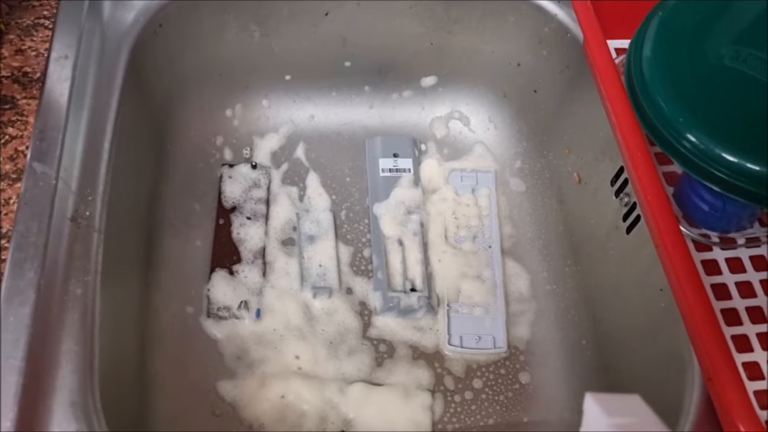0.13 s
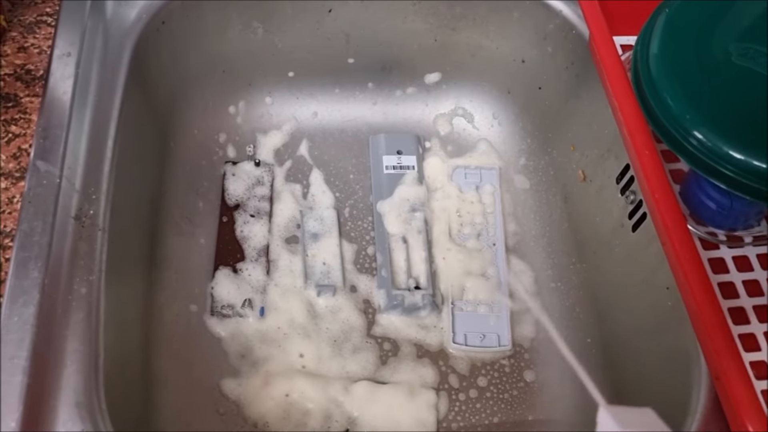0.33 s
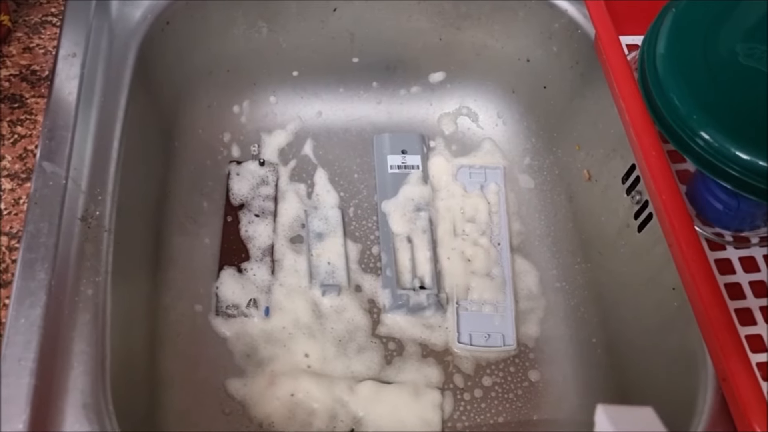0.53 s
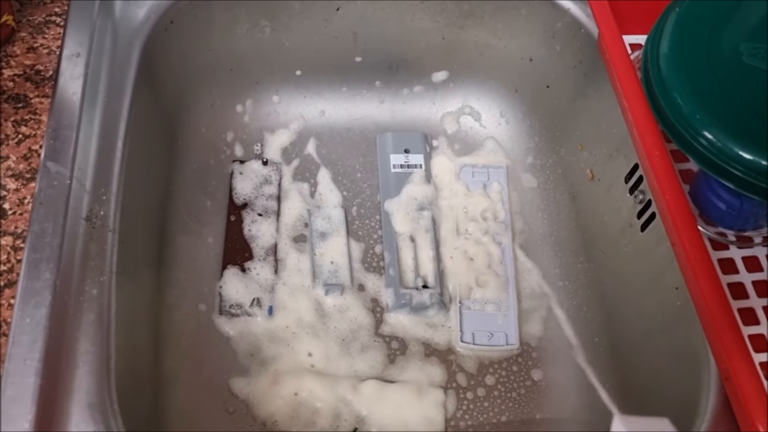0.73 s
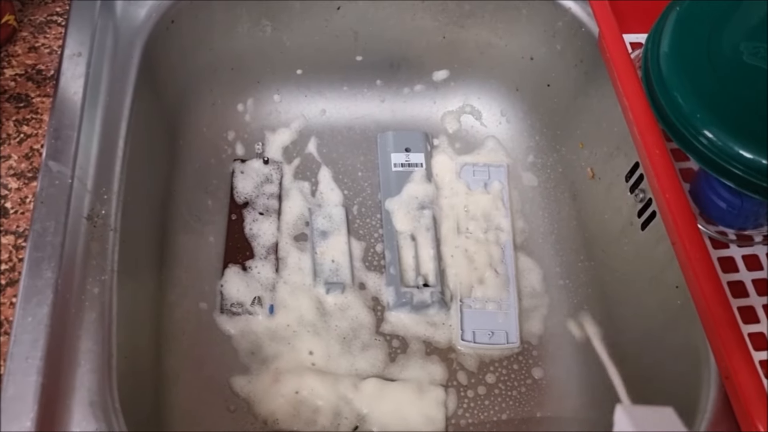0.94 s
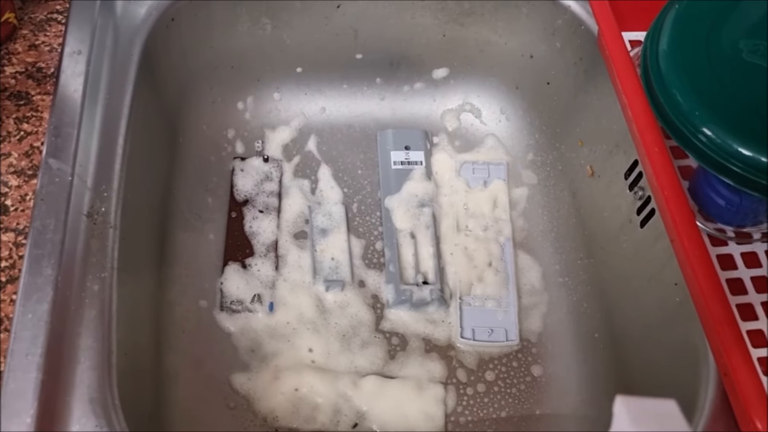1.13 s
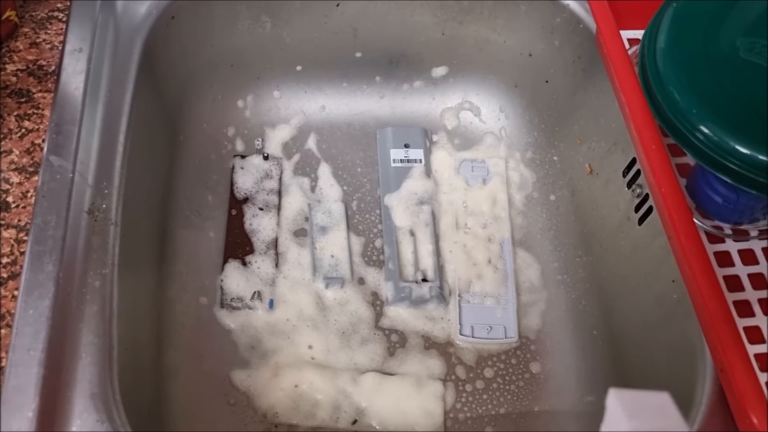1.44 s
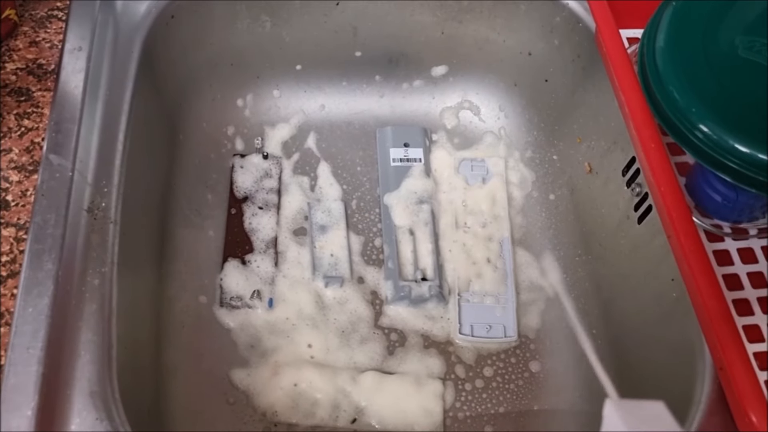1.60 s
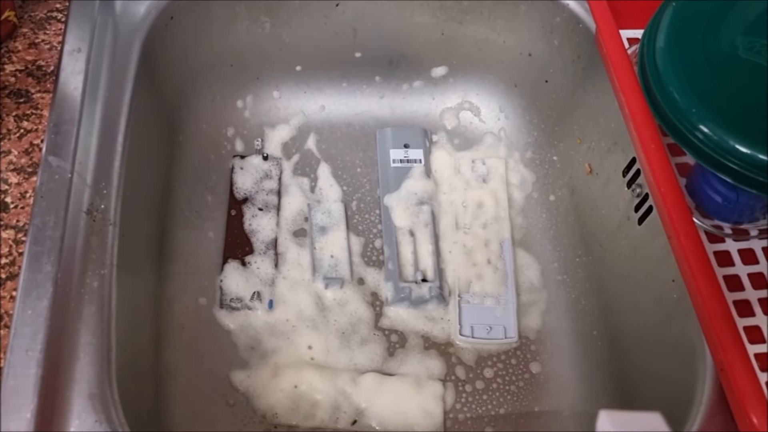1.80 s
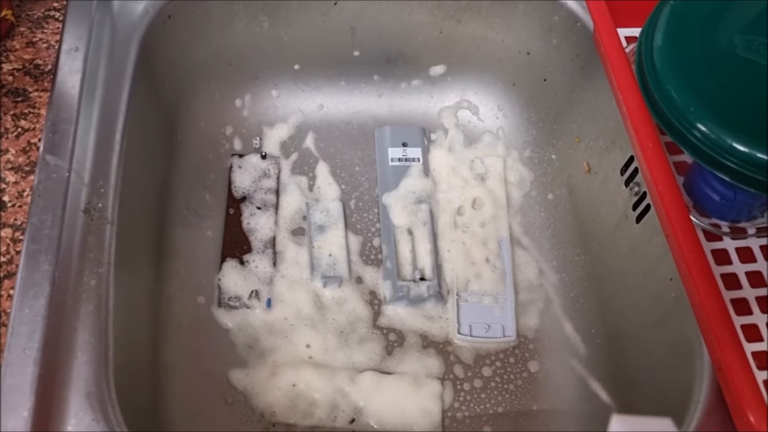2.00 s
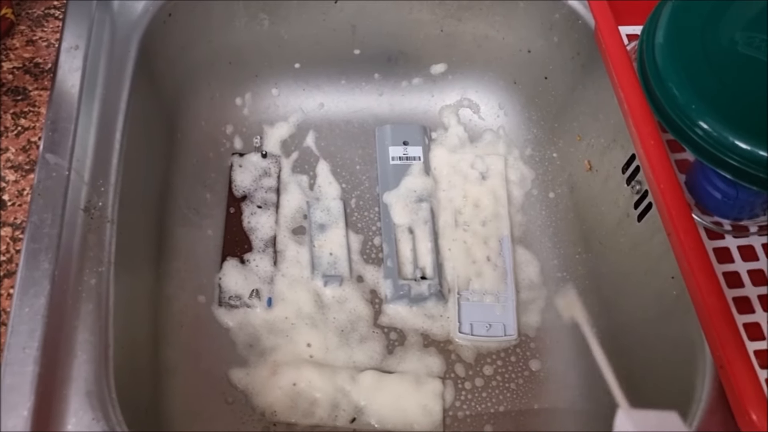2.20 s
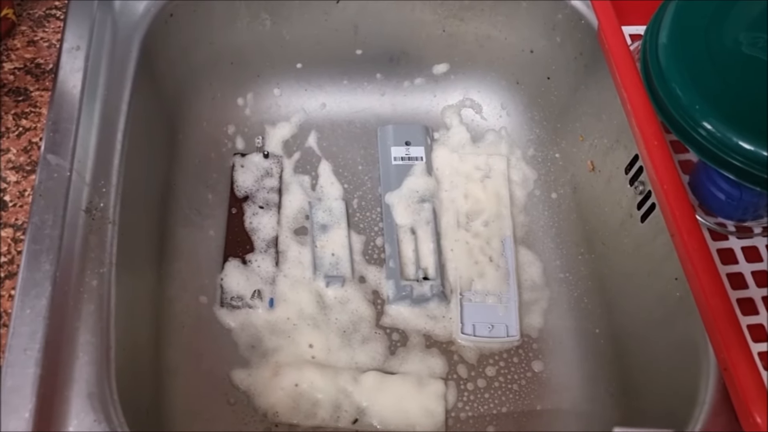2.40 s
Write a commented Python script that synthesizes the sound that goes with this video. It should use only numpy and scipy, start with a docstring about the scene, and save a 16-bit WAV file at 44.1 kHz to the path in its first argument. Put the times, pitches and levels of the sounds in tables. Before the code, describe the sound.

A trigger spray bottle is pumped eight times, close up, over a steel kitchen sink. Bright, slightly whistling hissing squirts of about 0.1 second start near 0.05, 0.4, 0.7, 1.0, 1.35, 1.7, 2.0 and 2.3 seconds. Plastic clicks and rattles come before and between them, with soft liquid slops and fine droplet patter after each. Dull hand bumps open it; a faint low appliance hum continues beneath.

```python
"""Over a steel kitchen sink, a trigger spray bottle is pumped eight times, close to a two-port microphone.
Each squeeze: plastic clicks ring the trigger's modes, the valve snaps and spits noise, and the jet hisses and
sings through nozzle resonances as pressure swells and sags. Droplets patter out as bursts of random impulses,
liquid slops in lumpy noise swells and the trigger rattles. An appliance hums on wavering sines over faint air."""
import sys
import numpy as np
from scipy import signal
from scipy.fft import rfft, irfft
from scipy.io import wavfile

SR = 44100
rng = np.random.default_rng(int(sys.argv[2]) if len(sys.argv) > 2 else 0)


def wrap_up_sound(samples):
    """Save the sound to the file named by the first command line argument, as 16-bit audio."""
    columns = np.atleast_2d(samples).T
    # keep every value between -1 and 1, then stretch to whole-number steps
    tamed = np.clip(columns, -1, 1)
    steps = np.round(tamed * 32767).astype(np.int16)
    wavfile.write(sys.argv[1], SR, steps)


def invert_db(level):
    """Linear amplitude ratio for a level in decibels (20 dB per decade), elementwise."""
    return 10 ** (np.asarray(level, dtype=float) / 20)


N = 112454

# Orders of the appliance's motor: f/Hz, level/dB
MOTOR_ORDERS = [(40.4, -61.5), (80, -63), (121, -76), (160.6, -66)]
# Spectrum of the room's air: f/Hz, relative level/dB
AIR_SPECTRUM = [(26, -29), (36, -19), (65, -7), (100, -2), (230, -10), (330, -6), (960, -21), (1330, -30),
                (1940, -27), (4000, -25), (8000, -27), (16000, -63)]
# Likeness of the air at left and right: f/Hz, likeness/1
AIR_LIKENESS = [(60, 0.71), (300, 0.68), (1000, 0.23), (4000, 0.09)]
# Soft bumps of the hand: t/s, level/dB, f/Hz, T60/s
HAND_BUMPS = [(0.05, -33.5, 72.5, 0.34), (0.086, -32, 81, 0.11), (0.141, -45, 66, 0.18),
              (0.186, -50, 325, 0.23), (.215, -46, 288, 0.128), (0.584, -43.5, 127.6, 0.22)]
# Piston knocking back after each squeeze: t/s, level before the knock trim/dB
PISTON_KNOCKS = [(0.191, -45.5), (0.551, -48.5), (0.872, -43), (1.191, -51.5), (1.499, -46.5),
                 (1.82, -45.5), (2.139, -51), (2.441, -49.5)]
# Spectrum of liquid slopping in the pump: f/Hz, relative level/dB
SLOP_SPECTRUM = [(200, -21.5), (330, -3), (450, -12.5), (580, -5.5), (720, -3.5), (850, -4), (1000, -7),
                 (1600, -9), (2200, -31.5)]
# Trigger clicks: t/s, level before the click trim/dB, lift of the upper modes/dB
TRIGGER_CLICKS = [(0.016, -45, -16), (0.209, -41.5, -8), (0.2276, -42.5, -1), (0.261, -46, -5),
                  (0.2786, -44, 3), (0.344, -54, -8), (0.379, -42, -10), (0.403, -37.5, -22),
                  (0.6097, -39, -7), (0.7, -45, 5), (0.7245, -35, -18), (0.8738, -40, -7),
                  (0.9425, -42, -8), (1.0164, -42.5, 7), (1.039, -35, -14), (1.231, -46, 5),
                  (1.3414, -40, 0), (1.357, -40, -5), (1.3657, -32, -5), (1.5156, -51, -7),
                  (1.5614, -41.5, -3), (1.662, -40.5, 5), (1.6784, -43.5, -9), (1.6867, -32, -20),
                  (1.8683, -45, 5), (1.91, -51, -9), (1.967, -48, -11), (1.9755, -41, 5), (1.989, -39, -11),
                  (1.9973, -30.5, -4), (2.1768, -40, 7), (2.2785, -40.5, 3), (2.295, -38, -9),
                  (2.302, -35, 4), (2.472, -39, -5.0), (2.4987, -49, -9)]
# Lower modes of the plastic trigger, before the grip shifts them: f/Hz, level/dB, T60/s
TRIGGER_LOW_MODES = [(810, -23, 0.011), (1244, -12, 0.075), (1295, -2.5, 0.05), (1344, 3.5, 0.028),
                     (1510, -7, 0.009), (1690, -2.5, 0.016), (1870, -14.5, .01)]
# Upper modes of the trigger, which follow each click's lift: f/Hz, level/dB, T60/s
TRIGGER_HIGH_MODES = [(2550, -11, 0.024), (2980, 0.5, 0.018), (3940, -25, 0.0028)]
# Spectrum of droplets on foam and steel: f/Hz, relative level/dB
PATTER_SPECTRUM = [(180, -58), (300, -3.5), (447, -35), (1030, -11), (1340, -9), (1610, -10), (2480, -3.5),
                   (3580, -4), (16000, -23.5)]
# Squeezes: valve opens t/s, top of pressure t/s, valve shuts t/s, top level/dB, mist lift/dB
PUMP_SQUEEZES = [(0.051, 0.141, 0.2, -38, 3), (0.4, 0.461, 0.54, -37, -.5),
                 (0.7218, 0.802, 0.87, -38, -0.5), (1.033, 1.104, 1.1654, -37.5, -1),
                 (1.3584, 1.407, 1.514, -37.5, -.5), (1.6787, 1.744, 1.8184, -37.5, -0.3),
                 (1.9894, 2.05, 2.113, -36, -3), (2.295, 2.345, 2.424, -37.5, -4.5)]
# Nozzle resonances, before wander and widening: centre f/Hz, width f/Hz, relative level/dB
NOZZLE_MODES = [(2327, 157, -8.5), (2525, 260, -11.5), (2745, 190, -2.5), (2970, 107, -9), (3220, 110, -7),
                (3820, 98, -17), (1320, 110, -18.5)]
# Hiss of the jet: f/Hz, relative level/dB
MIST_SPECTRUM = [(2000, -29.5), (3300, 3), (3600, -2), (3870, -0.5), (4500, 1.5), (5280, 4), (5800, 2.5),
                 (6290, 3), (6710, -3.5), (7300, 4.5), (8000, 0), (8810, -7), (9600, -7), (10500, -2),
                 (12000, -8), (16500, -4)]
# Finest spray: f/Hz, relative level/dB
FIZZ_SPECTRUM = [(9000, -33), (11500, -3.5), (13800, 1.5), (16500, -3.5)]
# Dry treble ticks of droplets and spring: t/s, level before the tick trim/dB
DRY_TICKS = [(0.261, -44), (0.342, -45.5), (0.378, -45.5), (0.587, -46), (0.681, -41), (0.7045, -41.5),
             (0.889, -36.5), (0.918, -42), (1.0174, -43), (1.231, -47), (1.342, -38.5), (1.662, -41),
             (1.912, -40.5), (1.9753, -36.5), (2.206, -44), (2.2805, -38)]
# Spectrum of those ticks: f/Hz, relative level/dB
TICK_SPECTRUM = [(2000, -3), (3000, -2.5), (5500, -1.5), (8000, -3), (9500, -14), (16000, -18)]


def evened(x):
    """Scales x to rms 1."""
    return x / np.sqrt(np.mean(x ** 2) + 1e-20)


def read(points, hz):
    """Reads a spectrum table at hz, along a log frequency axis."""
    f, value = np.transpose(points)
    return np.interp(np.log(hz + 1), np.log(f + 1), value)


def colour(x, points):
    """Filters x by a spectrum table, to rms 1."""
    gain = invert_db(read(points, np.fft.rfftfreq(N, 1 / SR)))
    return evened(irfft(rfft(x) * gain, N))


def slow(rate_hz):
    """Smooth random drift: low-passed noise, rms 1."""
    return evened(signal.lfilter(*signal.butter(2, rate_hz, fs=SR), rng.standard_normal(N)))


def resonate(x, hz, width):
    """Shifts the curve hz down to zero, smooths twice, and shifts back: a steep moving resonance."""
    turn = np.exp(2j * np.pi * np.cumsum(hz) / SR)
    r = np.exp(-np.pi * width / SR)
    smooth = signal.lfilter([(1 - r) ** 2], [1, -2 * r, r * r], x / turn)
    return 2 * (turn * smooth).real


def train(times, sizes):
    """One single-sample click per event."""
    out = np.zeros(N)
    np.add.at(out, np.clip((np.asarray(times) * SR).astype(int), 0, N - 1), sizes)
    return out


def fading(x, t60):
    """Instant rise, exponential fall."""
    return signal.lfilter([1], [1, -np.exp(-np.log(1000) / (t60 * SR))], x)


def bursting(per_s, floor_db, spread_db):
    """Levels of random impulses at a mean rate, a few of them far louder than the floor."""
    loudness = invert_db(floor_db + spread_db * np.minimum(rng.exponential(1, N), 4.5))
    return loudness * (rng.random(N) < per_s / SR)


def room():
    """Motor orders waver in level and phase over a quiet noise floor, most alike left and right in the bass."""
    air_db, waver_db, drift_rad = -61, 2.5, 0.59
    t = np.arange(N) / SR
    hum = np.zeros(N)
    for hz, db in MOTOR_ORDERS:
        level = np.sqrt(2) * invert_db(db + waver_db * slow(16.5))
        hum += level * np.sin(2 * np.pi * (hz * t + rng.random()) + drift_rad * slow(1.34))
    a, b = rfft(rng.standard_normal((2, N)))
    same = np.clip(read(AIR_LIKENESS, np.fft.rfftfreq(N, 1 / SR)), 0, 1)
    air = irfft([a, same * a + np.sqrt(1 - same ** 2) * b], N)
    return hum + invert_db(air_db) * np.array([colour(side, AIR_SPECTRUM) for side in air])


def sink(x):
    """Short steel-basin tails of sparse taps, different at each port, blending as the hand sways."""
    t60_s, sway_per_s = 0.057, 9
    taps = rng.choice([-1., 1.], (3, 2, 4000)) * (rng.random((3, 2, 4000)) < 0.3)
    taps *= invert_db(-60 * np.arange(4000) / SR / t60_s)
    taps[..., :40] = 0  # a short gap ahead of the tail
    taps = signal.lfilter(*signal.butter(1, 500, "high", fs=SR), taps)
    taps /= np.linalg.norm(taps, axis=2, keepdims=True)
    thirds = np.arange(3)[:, None] / 3
    sway = np.sqrt(2 / 3) * np.cos(2 * np.pi * (sway_per_s * np.arange(N) / SR + thirds))
    return signal.oaconvolve((x * sway)[:, None], taps, axes=2)[..., :N].sum(0)


def bumps():
    """The hand's dull low pushes: decaying sines with a soft start."""
    t, out = np.arange(N) / SR, np.zeros(N)
    for s, db, hz, t60 in HAND_BUMPS:
        u = np.maximum(t - s, 0)
        out += invert_db(db - 60 * u / t60) * (1 - np.exp(-u / 0.0015)) * np.sin(2 * np.pi * hz * u)
    return out


def slop():
    """Liquid slops in lumpy low-mid swells after the valve opens, and starts sharply as the piston knocks back."""
    swell_db, delay_s, spread_s = -53.5, 0.017, 0.018
    knock_trim_db, knock_t60_s = -8, 0.27
    t, (s, knock_db) = np.arange(N) / SR, np.transpose(PISTON_KNOCKS)
    swell = fading(train(s, invert_db(knock_db + knock_trim_db)), knock_t60_s)
    for opens, *_ in PUMP_SQUEEZES:
        swell += invert_db(swell_db) * np.exp(-0.5 * ((t - opens - delay_s) / spread_s) ** 2)
    lumps = invert_db(2.46 * slow(127.0))
    return swell * lumps * colour(rng.standard_normal(N), SLOP_SPECTRUM)


def trigger():
    """Each click is a soft-starting bump of plastic that rings the trigger's modes; a faint rattle runs between."""
    click_trim_db, scuff_s = -3, 0.0009
    grips, grip_spread = 5, 0.04  # each grip shifts every mode by about this share
    s, db, bright_db = np.transpose(TRIGGER_CLICKS)
    rattle = bursting(370, -68, 2.5)
    t, out = np.arange(2000) / SR, np.zeros(N)
    grip = np.repeat(rng.integers(0, grips, N // 500 + 1), 500)[:N]  # redrawn every 500 samples
    for modes, lift_db in ((TRIGGER_LOW_MODES, 0), (TRIGGER_HIGH_MODES, bright_db)):
        hits = train(s, invert_db(db + lift_db + click_trim_db)) + rattle
        for k in range(grips):
            ring = np.zeros(len(t))
            for hz, mode_db, t60 in modes:
                shifted_hz = hz * (1 + grip_spread * rng.standard_normal())
                ring += invert_db(mode_db - 60 * t / t60) * np.sin(2 * np.pi * (shifted_hz * t + rng.random()))
            soft_ring = ring * (1 - np.exp(-t / scuff_s)) ** 2
            out += signal.oaconvolve(hits * (grip == k), soft_ring)[:N]
    return out


def patter(p_db):
    """Dense small droplets land and burst, lingering after each squeeze."""
    level_db, t60_s = -10, 0.31  # level relative to the smoothed pressure
    drops = rng.standard_normal(N) * bursting(5400, 0, 3.2)
    r = np.exp(-np.log(1000) / (t60_s * SR))
    wet = signal.lfilter([1 - r], [1, -r], invert_db(p_db))
    return invert_db(level_db) * wet * colour(drops, PATTER_SPECTRUM)


def pressure_db():
    """Jumps as the valve opens, swells, sags, and drains once it shuts; also gives each squeeze's mist lift."""
    start_db, sag_db, shut_db_per_s, bend = -10.5, -7, 296, 1.92
    t, out, lift = np.arange(N) / SR, np.full(N, -120.), np.zeros(N)
    for opens, top, shuts, top_db, mist_db in PUMP_SQUEEZES:
        rise = np.clip((top - t) / (top - opens), 0, 1)
        sag = np.clip((t - top) / (shuts - top), 0, 1)
        db = top_db + start_db * rise ** bend + sag_db * sag ** bend
        db -= shut_db_per_s * np.maximum(t - shuts, 0)
        out = np.where(t >= opens, db, out)
        lift = np.where(t >= opens, mist_db, lift)
    return out, lift


def nozzle_tone():
    """Rushing noise rings the nozzle's resonances, which wander as foam passes."""
    rush, tone = rng.standard_normal(N), np.zeros(N)
    for k, (hz, width, db) in enumerate(NOZZLE_MODES):
        wandering_hz = hz + 22 * slow(42)
        tone += (-1) ** k * invert_db(db) * resonate(rush, wandering_hz, width * 1.71)  # alternating sign
    return evened(tone)


def jet(p_db, lift_db):
    """Turbulence rings the nozzle; hiss and fizz grow faster with pressure; the valve snaps and spits open."""
    mist_db, mist_slope, fizz_db, fizz_slope = -37.5, 1.83, -40.5, 2.3  # slopes in dB per dB of pressure
    tone_slope, full_db = 0.22, -37.5  # the nozzle sings best at high pressure
    spit_db, spit_t60_s, snap_db, snap_t60_s = -46.884, 0.066, -35.384, 0.0062
    tick_trim_db, tick_t60_s = -5, 0.023
    over_db = p_db - full_db
    mist = colour(rng.standard_normal(N), MIST_SPECTRUM)
    fizz = colour(rng.standard_normal(N), FIZZ_SPECTRUM)
    tick = colour(rng.standard_normal(N), TICK_SPECTRUM)

    singing = nozzle_tone() * invert_db(p_db + tone_slope * np.maximum(over_db, -15) + 0.5)
    hiss = mist * invert_db(mist_db + lift_db + mist_slope * over_db)
    hiss += fizz * invert_db(fizz_db + lift_db + fizz_slope * over_db)
    flutter = invert_db(1.28 * slow(121))

    opens = train([row[0] for row in PUMP_SQUEEZES], 1)
    spit = invert_db(spit_db) * fading(opens, spit_t60_s) * mist
    snap = invert_db(snap_db) * fading(opens, snap_t60_s) * (mist + 0.46 * fizz)
    s, db = np.transpose(DRY_TICKS)
    ticks = tick * fading(train(s, invert_db(db + tick_trim_db)), tick_t60_s)
    return singing + flutter * hiss + spit + snap + ticks


def at_ports(near, left_db, wet_db):
    """Sound reaches the left port later than the right, at its own level, with the sink's tail added."""
    left_lag = 3.59  # samples; the bottle is to the right
    left = irfft(rfft(near) * np.exp(-2j * np.pi * left_lag * np.fft.rfftfreq(N)), N)
    ports = np.array([left, near]) + invert_db(wet_db) * sink(near)
    return ports * invert_db(np.array([[left_db], [0]]))


def scene():
    """Room and hand bumps, the pump's clicks and slop, then the spray over them."""
    p_db, lift_db = pressure_db()
    background = bumps() + room()
    pump = at_ports(trigger() + slop(), 3, -3.5)  # the pump in the hand is nearer and drier
    spray = at_ports(jet(p_db, lift_db) + patter(p_db), -2.5, 0.5)
    return background + pump + spray


def top_cut(x):
    """Nothing passes above the cut-off."""
    return signal.sosfilt(signal.butter(12, 16820, fs=SR, output="sos"), x)


def record(dry):
    """Rolls the top off steeply at 15.9 kHz with a long symmetric filter."""
    edge = signal.firwin(255, 15900, window=("kaiser", 8), fs=SR)
    limited = signal.oaconvolve(dry, edge[None], "same")
    return top_cut(limited)


dry = scene()
out = record(dry)
wrap_up_sound(out)
```